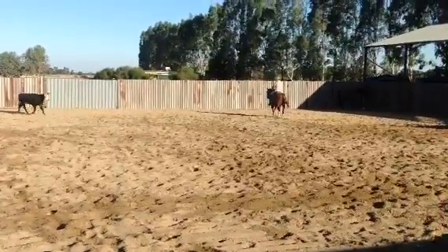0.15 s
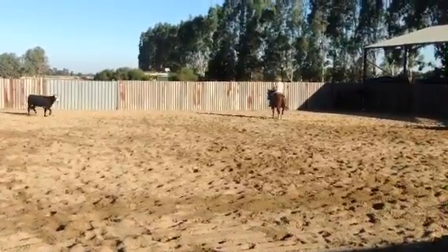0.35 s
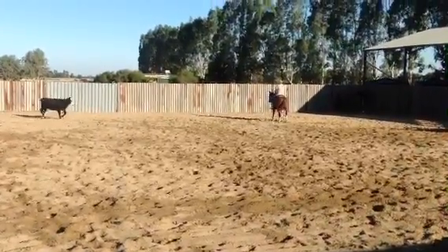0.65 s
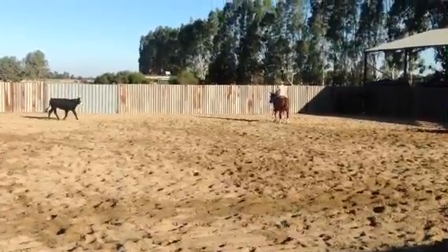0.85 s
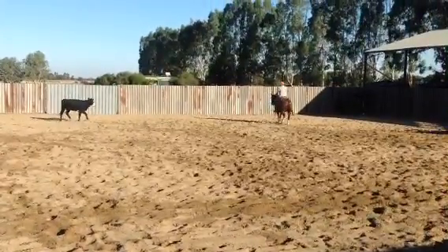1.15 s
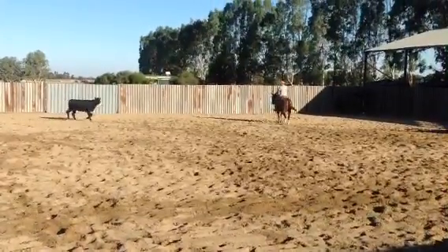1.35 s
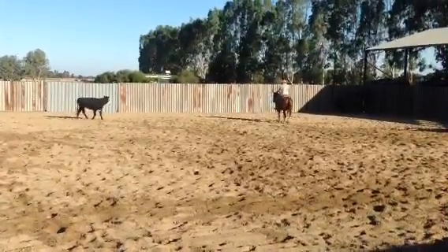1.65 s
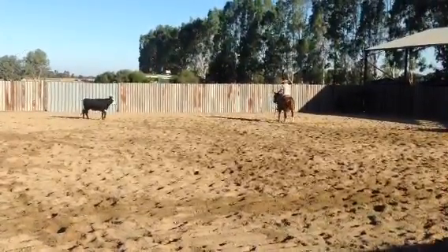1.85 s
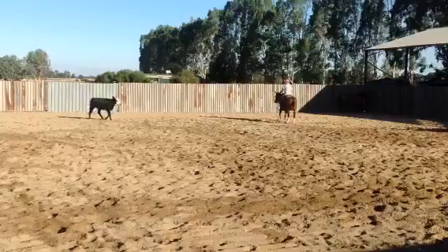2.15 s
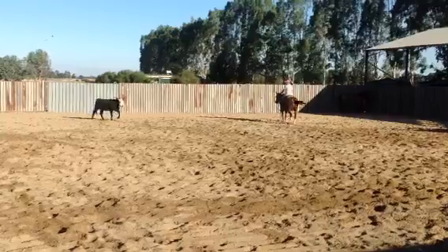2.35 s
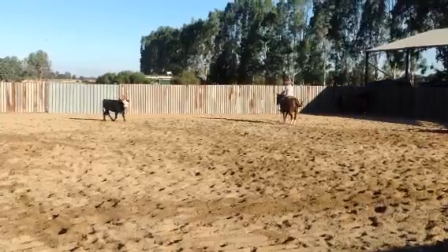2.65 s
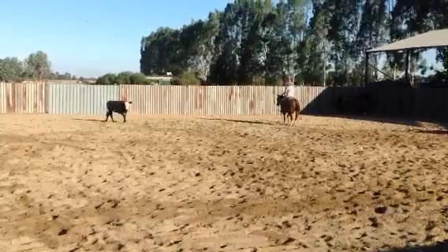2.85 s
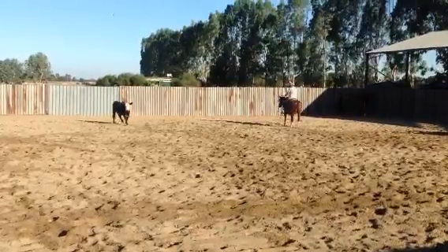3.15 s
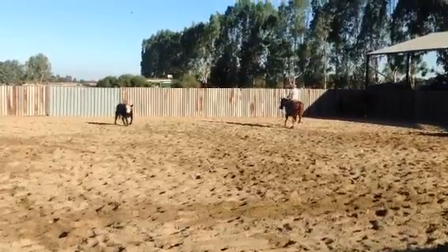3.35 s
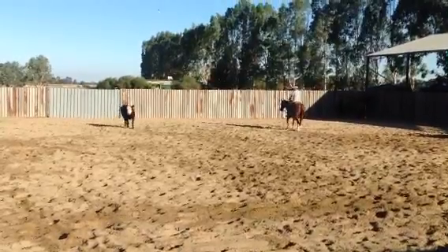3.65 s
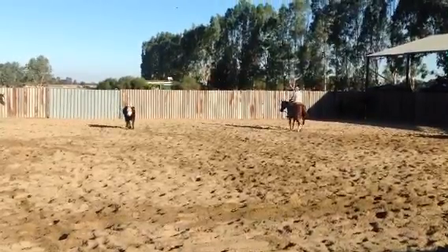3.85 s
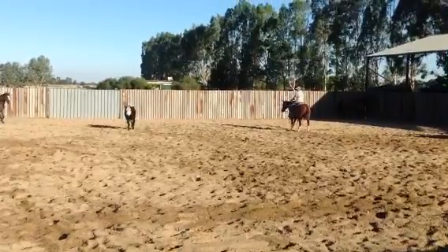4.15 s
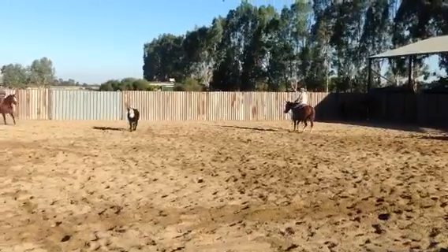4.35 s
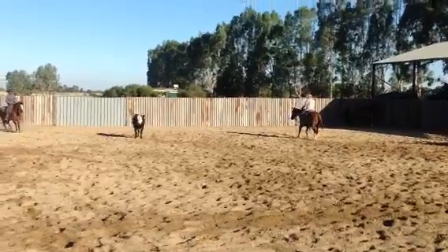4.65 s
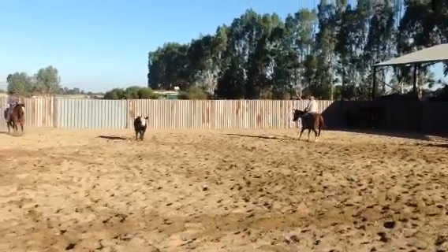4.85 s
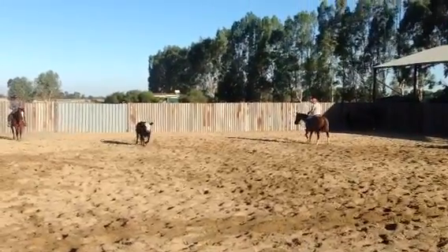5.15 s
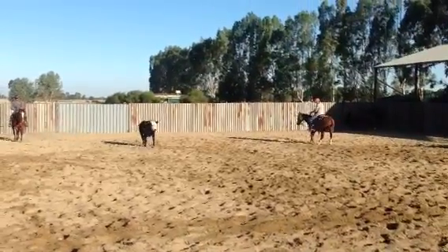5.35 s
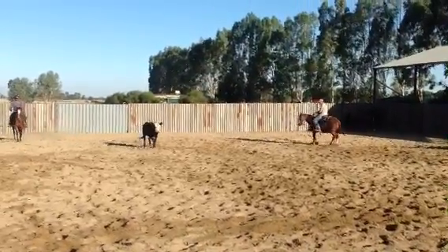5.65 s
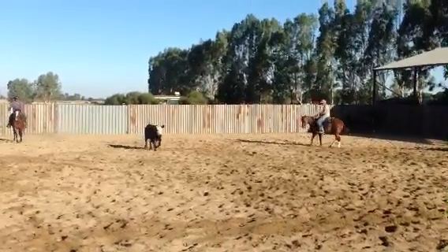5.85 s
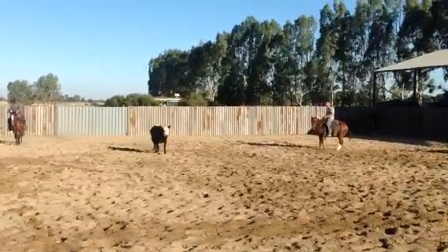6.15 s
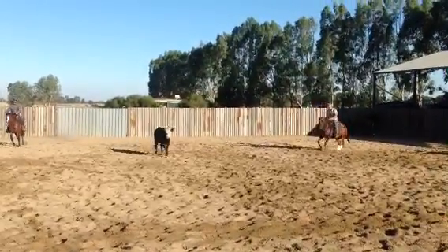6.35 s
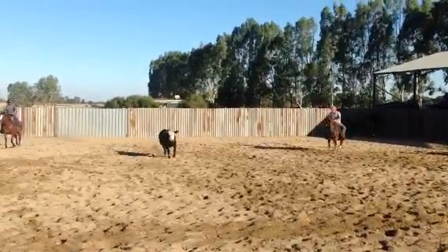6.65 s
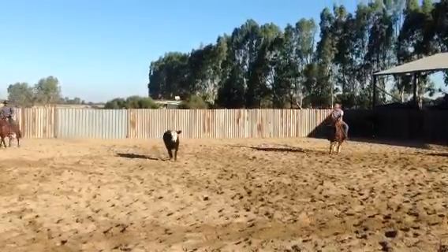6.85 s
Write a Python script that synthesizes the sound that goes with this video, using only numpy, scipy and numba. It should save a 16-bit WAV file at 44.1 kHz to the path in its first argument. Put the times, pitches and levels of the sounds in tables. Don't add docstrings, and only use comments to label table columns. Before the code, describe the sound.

Soft sand thuds, then a horse's squealing, quavering whinny ending in low raspy snorts, followed by sparse ticks, knocks and faint distant bird chirps.

```python
import sys
import numpy as np
from scipy import signal
from scipy.fft import rfft, irfft
from scipy.io import wavfile
from scipy.ndimage import uniform_filter1d
from numba import njit

SR = 44100
rng = np.random.default_rng(int(sys.argv[2]) if len(sys.argv) > 2 else 0)


def makeup_ratio(level_db):
    decades = np.asarray(level_db, float) / 20
    return 10 ** decades


def output_pcm(signal):
    pcm = np.clip(np.atleast_2d(signal).T, -1, 1) * 32767
    wavfile.write(sys.argv[1], SR, np.round(pcm).astype(np.int16))


N = 309141

# [f/Hz, width/Hz, level/dB]
NOSE_MODES = [(2595, 430, -1), (3400, 330, 5.5), (3810, 250, 7), (4040, 910, -3), (6200, 1300, -2),
              (8030, 1700, -13)]


@njit
def svf(x, hz, width):
    y, band, low = np.empty(len(x)), 0., 0.
    g, k = np.tan(np.pi * hz / SR), width / hz
    for i in range(len(x)):
        v = (band + g * (x[i] - low)) / (1 + g * (g + k))
        band, low, y[i] = 2 * v - band, low + 2 * g * v, k * v
    return y


def unit(x):
    return x / np.sqrt(np.mean(x ** 2))


def walk(rate, size=N):
    k = int(SR / rate)
    smooth = uniform_filter1d(rng.standard_normal(size), k)
    return unit(uniform_filter1d(smooth, k))


def play(table):
    s, *columns = np.transpose(table)
    start = int(s[0] * SR)
    t = np.arange(start, int(s[-1] * SR)) / SR
    gate = np.clip(np.minimum(t - s[0], s[-1] - t) / 0.008, 0, 1)
    return start, gate, [np.interp(t, s, c) for c in columns]


def add(out, start, x):
    x = x[:max(len(out) - start, 0)]
    out[start:start + len(x)] += x


def modes(x, table):
    out = 0
    for k, (hz, width, db) in enumerate(table):
        once = svf(x, 1. * hz, 1.67 * width)
        out = out + (-1) ** k * makeup_ratio(db) * svf(once, 1. * hz, 1.67 * width)
    return unit(out)


def strand(table, jitter, shimmer_db, rough, second_db, sixth_db):
    # [f/Hz, level/dB]
    upper = [(2850, 3), (3150, 0), (3550, 0), (4150, 0), (4700, -5.5), (6200, -12), (8200, -13.5),
             (10300, -32)]
    upper_hz, upper_level = np.transpose(upper)
    out = np.zeros(N)
    start, gate, (hz, whistle_db, body_db) = play(table)
    size = len(hz)
    phase = 2 * np.pi * np.cumsum(hz * (1 + jitter * walk(58, size=size))) / SR
    for k in range(1, 16):
        if k <= 3:
            db = (body_db, body_db + second_db, whistle_db)[k - 1]
        else:
            upper_db = np.interp(np.log(k * hz), np.log(upper_hz), upper_level)
            upper_db = sixth_db + upper_db - 0.82 * max(k - 6, 0)
            db = (body_db + 12.5 if k % 3 else whistle_db) + upper_db
        broken_db = shimmer_db * (1 + 0.6 * (k > 3)) * walk(64, size=size)
        broken_db = broken_db + 2 * (k > 3) * walk(25, size=size)
        tone = np.sin(k * phase + rough * k / 3 * walk(350, size=size))
        tone = tone * (1 + rough * walk(300, size=size))
        add(out, start, np.sqrt(2) * gate * makeup_ratio(db + broken_db) * tone)
    return out


def neigh():
    # [t/s, fold rate/Hz, whistle level/dB, body level/dB]
    squeal = [(0.512, 640, -56, -82), (0.57, 684.5, -36, -94), (0.599, 698, -43.5, -92),
              (0.629, 693, -35.5, -93), (0.692, 670, -37, -96), (.742, 691, -31.5, -96),
              (.78, 673, -41.5, -86), (0.819, 670, -49, -96)]
    wavering = [
        [(.71, 662, -35, -99), (.758, 645, -42, -89), (.772, 651, -26.5, -80), (.83, 650.4, -29, -65),
         (.895, 667, -30.5, -54), (.97, 682.5, -33, -52.5), (1.04, 681, -34.5, -53), (1.105, 671, -32.5, -52),
         (1.14, 700, -39, -37)],
        [(.95, 703, -33, -56), (1.03, 720, -34.5, -38.5), (1.1, 711.3, -32.5, -50.5),
         (1.165, 734.2, -25.5, -47.5), (1.2, 719.5, -37, -40), (1.245, 682, -28.5, -50), (1.3, 726, -30.5, -47),
         (1.36, 707, -51, -50), (1.41, 770, -36, -32)],
        [(1.19, 652.5, -37, -50), (1.225, 665.6, -35, -42), (1.26, 651, -29, -50), (1.3, 680.4, -38, -41),
         (1.37, 663, -36, -45)],
    ]
    sinking = [(1.31, 620, -56, -46), (1.35, 560, -42, -43), (1.375, 590, -35, -46), (1.405, 584, -42, -39),
               (1.43, 586, -23.5, -39), (1.452, 584, -26.5, -42), (1.476, 540, -56, -42),
               (1.53, 540, -62, -58), (1.64, 520, -66, -57)]
    # [pitch tremble/share, level tremble/dB, uneven cycles/0-1]
    unsteadiness = [(.0012, 2.0, .02), (.003, 2.4, .05), (.004, 2.4, .09), (.005, 2.6, .13),
                    (.007, 1.8, .16)]
    # [2nd partial over 1st/dB, 6th partial under the whistle/dB]
    balance = [(2, -14.5), (1, -21), (2.5, -23.5), (2.5, -20.5), (-16, -24)]
    # [t/s, effort level/dB, slackness/0-1]
    hoarse = [(.72, -64, 0.03), (.78, -42, 0.16), (.9, -39, 0.3), (1.1, -39.5, 0.04), (1.3, -41, 0.5),
              (1.36, -32, 0.84), (1.46, -37, 0.76), (1.55, -40, 0.72), (1.66, -45.5, .7)]
    # [f/Hz, width/Hz, level/dB]
    throat = [(1234, 130, -14), (1423, 176, -6.5), (1780, 83, -2), (1840, 110, -5.5), (2106, 110, 5),
              (2324, 66, -4.5), (2450, 280, -9)]
    growl = [(510, 88, -2), (570, 66, 1), (720, 60, -5.5), (1256, 160, -0.5)]

    out = np.zeros(N)
    for table, unsteady, partials in zip([squeal, *wavering, sinking], unsteadiness, balance):
        out += strand(table, *unsteady, *partials)
    start, gate, (effort_db, slack) = play(hoarse)
    for db, cavity in ((0, throat), (-15.5 + 7.5 * slack, NOSE_MODES), (-31.5 + 34 * slack, growl)):
        air = rng.standard_normal(len(gate)) * makeup_ratio(2.2 * walk(60, size=len(gate)))
        add(out, start, gate * makeup_ratio(effort_db + db) * modes(air, cavity))
    return out - svf(out, 3110., 330.)


def grunts():
    # [t/s, length/s, chest level/dB, rasp level/dB, hiss level/dB]
    grunt_list = [
        (1.454, 0.03, -44, -42, -63),
        (1.509, .075, -42.5, -56, -49.5),
        (1.619, 0.054, -52.5, -47, -52.5),
        (2.227, 0.045, -46.5, -47.5, -60),
        (2.32, 0.074, -61.5, -50.5, -56.5),
        (2.681, 0.056, -51, -48, -56),
        (2.813, 0.07, -48.5, -47.5, -54),
    ]
    # [f/Hz, width/Hz, level/dB]
    rasp_modes = [(720, 88, 3.5), (1314, 270, -0.5), (1734, 250, 3), (2064, 150, 5.5), (2326, 230, 0),
                  (2510, 140, -12.5)]
    flutter_hz, attack_s, release_s, foot_db = 59.44, 0.055, 0.062, -10.5
    out = np.zeros(N)
    for s, length, chest_db, rasp_db, hiss_db in grunt_list:
        end = s + length
        start, gate, (db,) = play([(s - attack_s, foot_db), (s, 0), (end, 0), (end + release_s, foot_db)])
        rate = flutter_hz * (1 + 0.2 * walk(45, size=N // 10))
        cycles = np.cumsum(rate)[:len(db)] / SR
        size = makeup_ratio(2.4 * rng.standard_normal(60))[cycles.astype(int)]
        flaps = np.diff(np.floor(cycles), prepend=0) * size
        deep = svf(svf(svf(flaps, 233.0, 58.0), 146.0, 89.0), 127.0, 127.0)
        upper_chest = svf(svf(flaps, 515.0, 240.0), 600.0, 350.0)
        chest = unit(deep) + makeup_ratio(-8.5) * unit(upper_chest)
        puff = np.sqrt(size) * (0.9 + np.exp(-(cycles % 1) / 0.75))
        air = rng.standard_normal(N // 10)[:len(db)] * puff
        voice = makeup_ratio(chest_db) * chest + makeup_ratio(rasp_db) * modes(air, rasp_modes)
        add(out, start, gate * makeup_ratio(db) * (voice + makeup_ratio(hiss_db) * modes(air, NOSE_MODES)))
    return out


def arena(x):
    # [delay/s, level/dB]
    echoes = [(.008, -46), (.04, -47), (.09, -53), (.15, -62), (.3, -71), (.5, -79), (.8, -90)]
    start, gate, (db,) = play(echoes)
    scatter = rng.standard_normal(len(db)) * makeup_ratio(db + 2.5 * walk(40, size=len(db)))
    response = np.r_[np.zeros(start), svf(scatter, 2100., 2500.)]
    return x * makeup_ratio(-3.5) + signal.fftconvolve(x, response)[:N]


def thuds():
    # [t/s, peak level/dB, f/Hz, length/s]
    blows = [(.004, -47, 92, .0042), (.024, -47, 180, 0.0048), (0.161, -35, 151, 0.0023),
             (.1755, -31, 313, 0.0016), (.186, -29, 188, 0.0028), (.312, -40.5, 130, 0.0063),
             (.325, -40, 164, 0.0027), (0.354, -33.5, 165, 0.0021), (.373, -48.5, 119, 0.0099),
             (1.085, -47.5, 158, 0.0038), (1.971, -66, 80, 0.012), (2.79, -61, 70.4, .016),
             (3.089, -66, 98, 0.013), (3.135, -61, 86.5, 0.01)]
    sag_per_s = 8
    out, t = np.zeros(N), np.arange(-1300, 1300) / SR
    for s, db, hz, length in blows:
        push = np.exp(-.5 * (t / length) ** 2)
        add(out, int(s * SR), makeup_ratio(db) * push * np.cos(2 * np.pi * hz * t * (1 - sag_per_s * t / 2)))
    return np.r_[out[1200:], np.zeros(1200)]


def struck(table, width):
    out, t = np.zeros(N), np.arange(8000) / SR
    for s, db, hz, t60 in table:
        blow = rng.standard_normal(len(t)) * makeup_ratio(-60 * t / t60) + 3.5 * (t == 0)
        burst = svf(svf(blow, 1. * hz, width * hz), 1. * hz, width * hz)
        add(out, int(s * SR), makeup_ratio(db) * burst / np.abs(burst).max())
    return out


def ticks():
    # [t/s, peak level/dB, f/Hz, t60/s]
    tick_list = [(.371, -48.5, 3980, 0.071), (.836, -40, 4440, 0.079), (.848, -39.5, 4140, 0.17),
                 (2.634, -45, 4930, 0.14), (3.466, -39.5, 1510, 0.11), (3.467, -47, 4000, .03),
                 (4.757, -35.5, 990, 0.006), (4.825, -49.5, 6000, 0.097), (4.832, -45, 800, 0.016),
                 (4.833, -43, 3500, .008), (5.04, -50, 6000, .02), (5.483, -37, 3470, 0.1),
                 (5.486, -48, 900, 0.099), (5.502, -48, 2570, 0.19), (6.125, -54, 5970, 0.15),
                 (6.229, -51, 2000, 0.29), (6.979, -36, 2420, .032), (6.982, -45, 810, .05)]
    return struck(tick_list, 1.03)


def knocks():
    # [t/s, peak level/dB, f/Hz, t60/s]
    knock_list = [(2.228, -38.5, 1780, 0.023), (2.351, -35, 1820, 0.017), (2.372, -37.5, 1770, 0.026),
                  (2.68, -41.5, 720, 0.045), (2.693, -42, 720, 0.069), (2.841, -46, 3400, .024),
                  (3.461, -48.5, 710, 0.25), (3.478, -49, 920, 0.093), (5.146, -42, 6000, 0.02),
                  (5.155, -51, 6100, .12), (5.484, -36.5, 2040, 0.011), (6.188, -48.5, 1930, .22)]
    return struck(knock_list, 0.18)


def bird():
    # [t/s, level/dB, f/Hz, level in the dip/dB]
    calls = [
        (0.084, -73, 5940, -1),
        (3.158, -61, 5970, -4),
        (4.911, -66.5, 6200, -11),
        (5.754, -75, 6020, -15),
        (6.584, -65.5, 6120, -13),
    ]
    # [t/s, pitch/ratio, level/dB]
    chirp = [(0, 1.0, 0), (.015, 1.0, 4), (.027, .99, 5), (.031, .92, 2), (.043, .67, 3), (.048, .65, -6),
             (.054, .8, 5), (.06, .85, -8)]
    out = np.zeros(N)
    _, _, (ratio, shape_db) = play(chirp)
    for s, db, hz, dip_db in calls:
        phase = 2 * np.pi * np.cumsum(hz * ratio) / SR
        level_db = db + shape_db + dip_db * (ratio < .9) + 7.1 * walk(200, size=len(ratio))
        add(out, int(s * SR), np.sqrt(2) * makeup_ratio(level_db) * np.sin(phase))
    return out


def far_tones():
    # [t/s, length/s, f/Hz, level/dB]
    tones = [
        (0.0, .3, 2020, -68),
        (1.68, .4, 2100, -61),
        (2.11, .42, 2090, -58.5),
        (3.1, .32, 1945, -69),
    ]
    out = np.zeros(N)
    for s, length, hz, db in tones:
        start, gate, (fade_db,) = play([(s, db), (s + length, db - 4)])
        drift, blur, broken = (walk(rate, size=N // 10)[:len(gate)] for rate in (25., 120., 60.))
        phase = 2 * np.pi * np.cumsum(hz * (1 + .013 * drift + .016 * blur)) / SR
        add(out, start, np.sqrt(2) * gate * makeup_ratio(fade_db + 3.5 * broken) * np.sin(phase))
    return out


def countryside():
    # [f/Hz, level per Hz/dB]
    hiss = [(40, -29.5), (155, -0.5), (251, 0), (1190, -2), (3570, -12), (5940, -12), (7560, -18.5),
            (15200, -26)]
    # [peak t/s, rise/dB, rise time/s, fall time/s]
    swell = (1.46, 2.3, 0.19, 0.47)
    f = np.maximum(np.fft.rfftfreq(N, 1 / SR), 1)
    hiss_hz, hiss_db = np.transpose(hiss)
    colour = makeup_ratio(np.interp(np.log(f), np.log(hiss_hz), hiss_db))
    low, high = 1 / (1 + (f / 400) ** 2), 1 / (1 + (3000 / f) ** 2)
    middle = np.maximum(1 - low - high, 0)
    out = 0
    for share, flicker_db in ((low, 1.2), (middle, .6), (high, .4)):
        band = irfft(rfft(rng.standard_normal(N)) * colour * np.sqrt(share), N)
        out = out + band * makeup_ratio(flicker_db * walk(11.4))
    peak, rise_db, rise, fall = swell
    t = np.arange(N) / SR
    swell_db = rise_db * np.exp(-np.abs(t - peak) / np.where(t < peak, rise, fall))
    return unit(out) * makeup_ratio(2.5 - 58 + swell_db)


def scene():
    horse = arena(neigh() + grunts())
    small = thuds() + ticks() + knocks() + bird() + far_tones()
    return (horse + small + countryside())[None]


def top_cut(x):
    return signal.sosfilt(signal.butter(12, 15340, fs=SR, output="sos"), x)


def record(dry):
    low_cut = signal.butter(2, 59.5, "high", fs=SR, output="sos")
    mix = signal.sosfilt(low_cut, dry)
    return top_cut(mix)


dry = scene()
out = record(dry)
output_pcm(out)
```